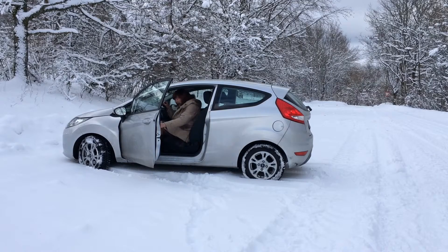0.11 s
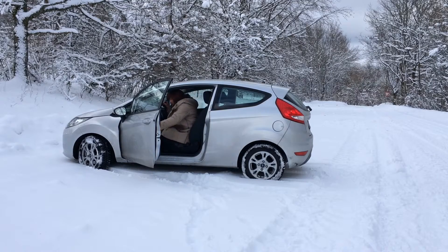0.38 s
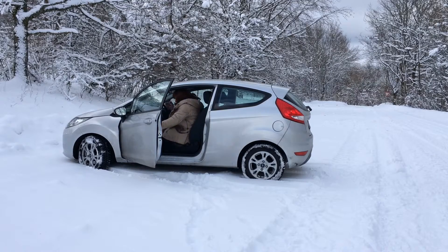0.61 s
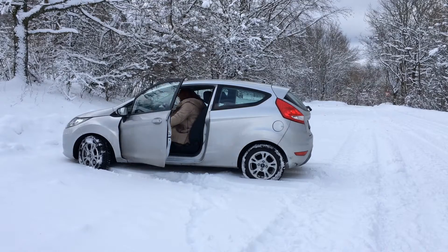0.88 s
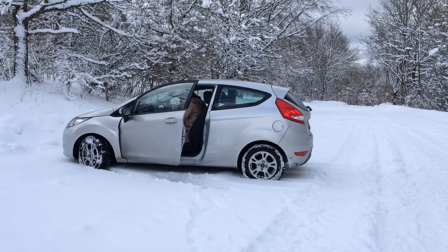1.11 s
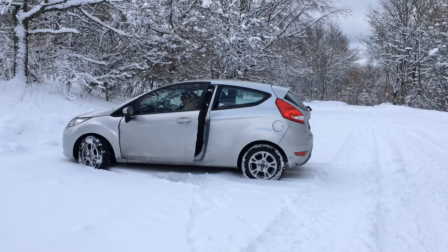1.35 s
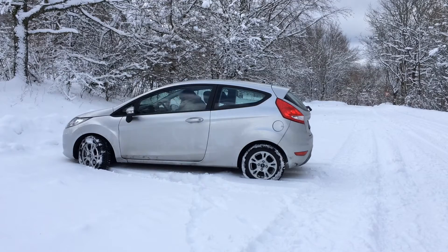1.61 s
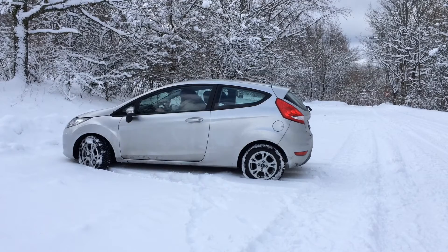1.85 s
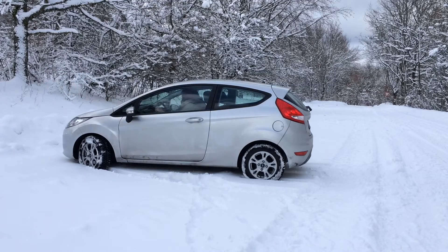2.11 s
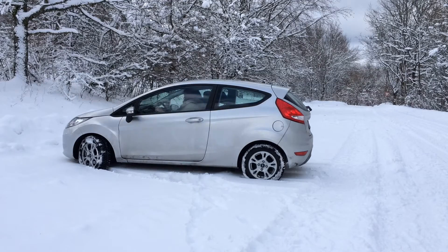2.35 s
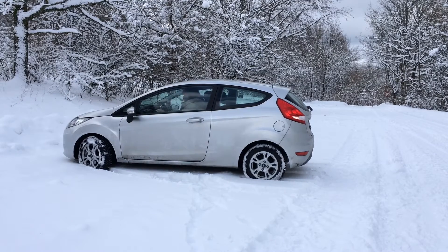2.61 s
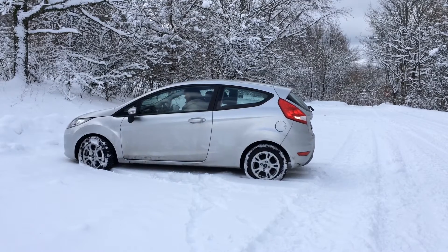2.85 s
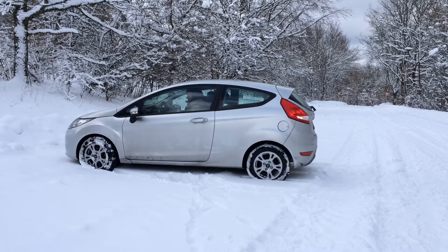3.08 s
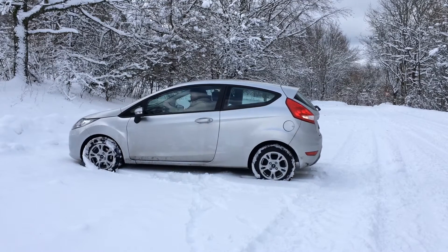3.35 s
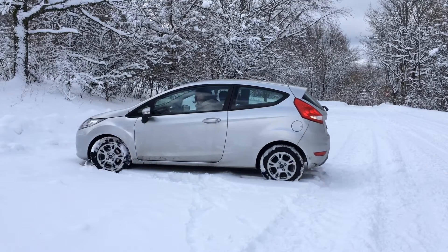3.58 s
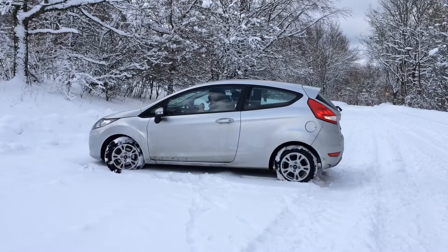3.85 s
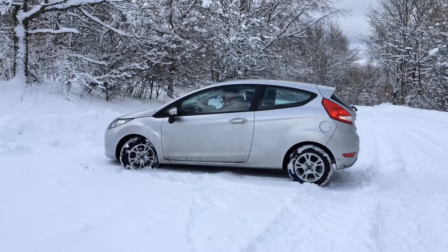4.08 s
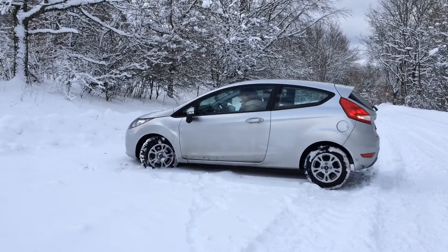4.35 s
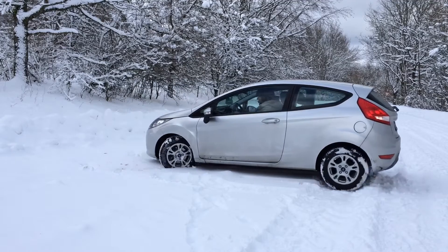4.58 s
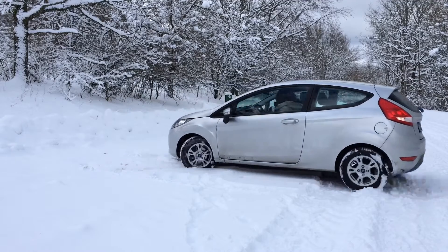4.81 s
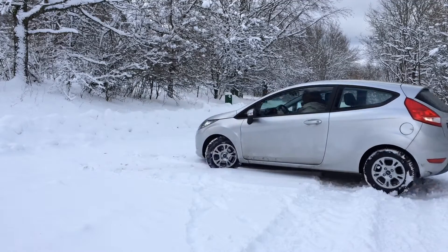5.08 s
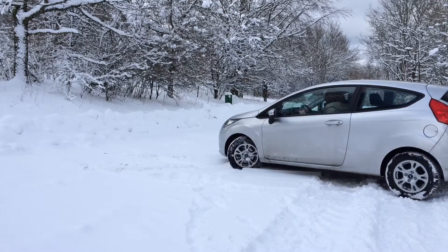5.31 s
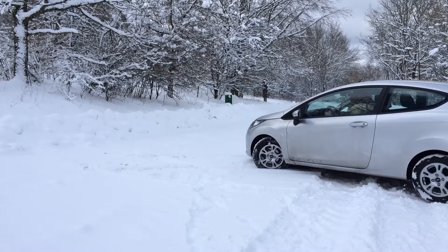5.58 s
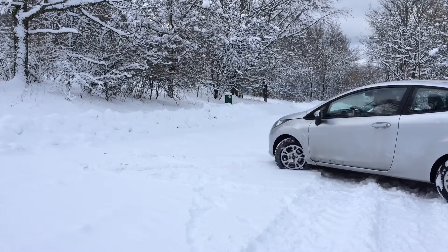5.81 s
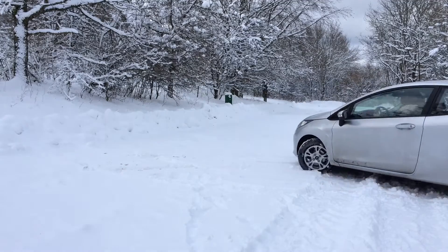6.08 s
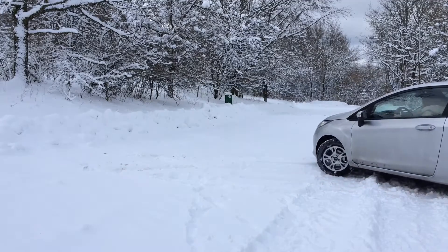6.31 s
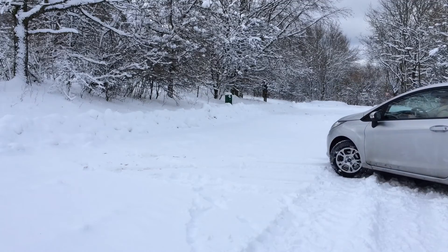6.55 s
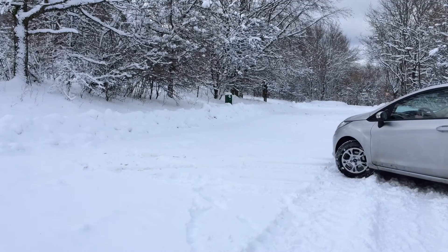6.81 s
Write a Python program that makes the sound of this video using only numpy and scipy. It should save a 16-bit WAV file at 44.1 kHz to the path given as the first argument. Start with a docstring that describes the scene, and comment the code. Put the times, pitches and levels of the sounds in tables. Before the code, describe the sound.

Mono outdoor sound, a few metres from a small car in a hushed, snow-muffled lane. From 0 to 1.6 s there is only low, faint air, tiny rustles, and soft wind bumps around 0.4-0.7 s. At 1.7 s the door slams: a hard metallic latch clack, panel knock and short rattle, with a deep cabin boom dying over about half a second. At 2.44 s everything dips briefly to silence. Low thumps follow and the engine emerges, climbing quickly until 3.2 s, then holding a firm clattery, hissy rev, strongest about 4-5 s. Heavy microphone thumps fall at 3.7-4.1 s. A reverse-gear whine rises in pitch from about 4 s to 5.8 s. After 5.2 s the revs sag, with a hollow, falling drone. From 6 s the engine subsides; packed snow cracks and crunches, sharpest near 6.75 s, as the clip ends quietly.

```python
"""Car backing out of a snowy lane

In a hushed lane under light wind, a car door slams: knocks and pushes ring damped modes, and low noise carries
the dying boom. The level dips briefly to nothing, then a four-cylinder engine revs as a sum of crank orders with
beating noise. The car backs away: gear-tooth harmonics whine through casing resonances, a sagging tone drones,
and packed snow cracks in grain bursts that ring the wheel arch. Low gust noise and sine puffs thump one microphone."""
import sys
import numpy as np
from scipy import signal
from scipy.fft import rfft, irfft
from scipy.io import wavfile
from scipy.ndimage import uniform_filter1d

SR = 44100
rng = np.random.default_rng(int(sys.argv[2]) if len(sys.argv) > 2 else 0)


def materialize(psi):
    """Save the field psi as 16-bit PCM at rate SR to the path in sys.argv[1].

    A 1-D psi becomes a single channel; in a 2-D psi each row is a channel.
    """
    bounded = np.clip(np.atleast_2d(psi).T, -1, 1)
    quanta = np.round(bounded * 32767).astype(np.int16)
    wavfile.write(sys.argv[1], SR, quanta)


def voltage_ratio(level):
    """Linear amplitude factor for a level in decibels (scalar or array-like)."""
    return 10 ** (np.asarray(level, float) / 20)


N = 305613
T = np.arange(N) / SR
TURN_S = 4.5  # time at which the slopes of the turning car cross zero


def evened(x):
    """Normalises the mean power, so that the rms is 1."""
    return x / np.sqrt(np.mean(x ** 2) + 1e-20)


def read(points, hz):
    """Interpolates a spectrum table along a logarithmic frequency axis."""
    f, value = np.transpose(points)
    return np.interp(np.log(hz + 1), np.log(f + 1), value)


def add(mix, s, sound):
    """Superposes a sound on the mix from time s."""
    part = mix[round(s * SR):][:len(sound)]
    part += sound[:len(part)]


def swell(start, rise, hold, fall):
    """Linear envelope that rises from 0 to 1, holds, and falls back; all arguments in seconds."""
    rising = (T - start) / rise
    falling = (start + rise + hold + fall - T) / fall
    return np.clip(np.minimum(rising, falling), 0, 1)


def drift(hz):
    """Slow random modulation of rms about 1, changing about hz times a second (at most 55)."""
    steps = rng.standard_normal(400)
    return uniform_filter1d(np.interp(T * min(hz, 55), np.arange(400), steps), 400) * 1.218


def noise(spectrum, patchy_db, size=1024):
    """Coloured noise of rms 1: random short-time spectra, with patches drifting in time and frequency."""
    frames = 4 * N // size + 5
    hz = np.fft.rfftfreq(size, 1 / SR)
    a, b, patches = rng.standard_normal((frames, len(hz), 3)).T
    patches = evened(uniform_filter1d(uniform_filter1d(patches, 10, 0), 12, 1))
    z = (a + 1j * b) * voltage_ratio(read(spectrum, hz)[:, None] + patchy_db * patches)
    return evened(signal.istft(z, nperseg=size, noverlap=3 * size // 4)[1][:N])


def resonant_noise(peaks):
    """Random excitation of a few resonances, each a bell-shaped peak in the noise spectrum."""
    bins = np.arange(300, 15600, 10.)
    lift = sum(voltage_ratio(db) / (1 + (2 * (bins - f) / width) ** 2) for f, width, db in peaks)
    return noise(np.c_[bins, 20 * np.log10(lift)], patchy_db=2.0, size=2048)


def near(modes, hz, fall_db):
    """Selective excitation: a blow favours modes near its own pitch, losing fall_db per octave away."""
    return [(f, db - fall_db * abs(np.log2(f / hz)), t60) for f, db, t60 in modes]


def ring(modes, seconds):
    """Impulse response of damped modes: a sum of exponentially dying sines, peak 1."""
    t = np.arange(round(seconds * SR)) / SR
    x = sum(voltage_ratio(db - 60 * t / t60) * np.sin(2 * np.pi * hz * t) for hz, db, t60 in modes)
    return x / abs(x).max()


def quiet():
    """Diffuse background: the far hush of the lane, slowly sinking, with faint resonant rustles."""
    # Hush of the lane. Each row: frequency in Hz, relative density in dB per Hz.
    hush_spectrum = [(18, -27), (30, -6), (59, 0.5), (108, -3.5), (160, 0), (263, -7.5), (389, -8.5),
                     (810, -15), (973, -9), (1170, -13.5), (1330, -10), (2770, -27.5), (3890, -28),
                     (14400, -35), (15600, -33)]
    # Faint high rustles. Each row: start, rise, hold and fall in seconds, level in dB.
    rustles = [(.04, .08, .1, .07, -80), (.41, .05, .1, .06, -81)]
    # Resonances of the rustles. Each row: frequency in Hz, width in Hz, relative level in dB.
    rustle_bands = [(2600, 600, -4), (4100, 700, 0), (6400, 900, -3)]
    hush_db, hush_db_per_s = -61.5, -0.84
    hush = voltage_ratio(hush_db + hush_db_per_s * T) * noise(hush_spectrum, patchy_db=0.85, size=2048)
    rustle_level = sum(voltage_ratio(row[4]) * swell(*row[:4]) for row in rustles)
    return hush + rustle_level * resonant_noise(rustle_bands)


def low_rumbles_and_puffs():
    """Low-frequency pressure: lumpy noise swells for gusts and the door's dying boom, damped sines for puffs."""
    # Low rumble. Each row: frequency in Hz, relative density in dB per Hz.
    rumble_spectrum = [(20, -24.5), (45, 6), (75, 8.5), (120, 6), (190, -3.5), (350, -35), (700, -62.5)]
    # Low rumbles: gusts, and the dying boom of the door at 1.9 s.
    # Each row: time of the top in seconds, level there in dB, rise and fall in dB per second.
    rumbles = [(0.0, -62, 98), (.47, -56.5, 70), (1.899, -45.5, 66.5), (4.06, -42, 36), (4.45, -40, 60),
               (4.72, -41.5, 108), (5.279, -43, 70), (5.5, -44.5, 30), (6.0, -44.5, 42), (6.93, -49.5, 38)]
    # Puffs that thump the microphone. Each row: start in seconds, level in dB, pitch in Hz, length scale in cycles.
    puffs = [(0.417, -40, 93, 1.7), (0.451, -35, 95, 2.1), (0.494, -32.5, 113, 1.9),
             (0.621, -38.5, 75.4, 0.91), (0.699, -52, 75.4, 1.9), (0.74, -47, 59.2, 1.5),
             (1.244, -40.5, 98, 1.9), (1.549, -48, 64.9, 2.3), (2.378, -47, 82, 1.8),
             (2.491, -25.5, 64.4, 0.97), (2.519, -30.5, 62.6, 2), (2.544, -24.5, 98, 0.93),
             (2.573, -33.5, 96.4, 3.3), (3.709, -21.5, 74.4, 1.5), (3.771, -28, 75, 0.94),
             (3.969, -21, 81, 1.8), (4.01, -21.5, 72, 0.83), (4.046, -18.5, 70.0, 0.51),
             (4.112, -46, 74.9, 1.05), (4.52, -27.5, 82.85, 1.2), (5.969, -30.5, 105.3, 2.2),
             (6.019, -31, 123.4, 1.9), (6.858, -43, 75.4, 2.5), (6.899, -39, 63, 1.5)]
    lumpy_db = 2.0
    level = np.zeros(N)
    for s, db, db_per_s in rumbles:
        level = np.maximum(level, voltage_ratio(db - db_per_s * abs(T - s)))
    rumble = noise(rumble_spectrum, patchy_db=0.0, size=2048)
    out = level * rumble * voltage_ratio(lumpy_db * drift(hz=35.2))
    for s, db, hz, cycles in puffs:
        u = np.arange(round(3 * cycles / hz * SR)) / SR * hz / cycles  # time in length scales
        envelope = np.e * 1.43 * u * np.exp(-2.5 * u)
        add(out, s, voltage_ratio(db) * envelope * np.sin(2 * np.pi * cycles * u))
    return out


def cracks():
    """Brittle fracture of packed snow: bursts of grains, heard directly and ringing nearby modes."""
    # Cracks and small knocks. Each row: start in seconds, peak of the ringing part in dB,
    # centre frequency in Hz, dry grit against ring in dB.
    events = [(0.563, -47, 800, -1), (2.469, -43.5, 890, -17), (2.569, -40.5, 640, -10),
              (6.007, -40.5, 1190, 3.5), (6.025, -41.5, 1220, -3), (6.104, -45, 1100, -13),
              (6.152, -42.5, 1206, -1), (6.487, -44, 1850, -6), (6.494, -38, 1572, 2.5),
              (6.537, -51, 1071, 4), (6.625, -40.5, 1150, -3), (6.644, -47, 1080, -11),
              (6.663, -46, 1285, -11.5), (6.697, -44, 1280, -4), (6.738, -43, 1180, -2),
              (6.756, -29.5, 1384, -4), (6.773, -35, 1295, -17), (6.787, -40.5, 1210, -2.5),
              (6.805, -52, 1494, -18)]
    # Wheel arch modes. Each row: frequency in Hz, relative level in dB, 60 dB decay time in seconds.
    wheel_arch = [(1100, -10, 0.12), (1190, -11, 0.047), (1440, -34, 0.01), (1444, -1, 0.019),
                  (1940, -4.5, 0.04), (2090, 1, 0.017), (2910, -14.5, 0.018), (3030, 6, 0.015),
                  (3980, -18, .02), (6100, -20, .015)]
    # Breaking snow. Each row: frequency in Hz, relative density in dB per Hz.
    grit_spectrum = [(300, -33), (700, -44), (1200, 10), (2000, 6.5), (3000, -1), (4000, -6.5),
                     (6500, -11.5), (9000, -16), (15600, -28)]
    fall_db, rise_s, crack_s = 9, 0.0044, .018
    out = np.zeros(N)
    t = np.arange(2048) / SR
    colour = voltage_ratio(read(grit_spectrum, np.fft.rfftfreq(2048, 1 / SR)))
    shape = np.minimum(t / rise_s, 1) * np.exp(-3 * t / crack_s)
    for s, db, hz, dry_db in events:
        grains = rng.standard_normal(2048)
        modes = near(wheel_arch + [(hz, 2, .025)], hz, fall_db)  # one more mode at the crack's own pitch
        spiky = grains * abs(grains) * shape
        rung = np.convolve(spiky, ring(modes, .08))
        grit = irfft(rfft(grains) * colour) * shape
        add(out, s, voltage_ratio(db) * rung / abs(rung).max())
        add(out, s, voltage_ratio(db + dry_db) * grit / abs(grit).max())
    return out


def door():
    """Modal excitation: knocks ring the panel and shake a rattle; pushes on the seals ring the cabin."""
    # Knocks of latch and door skin. Each row: start in seconds, rattle level in dB, panel peak in dB, pitch in Hz.
    knocks = [(1.679, -55.5, -40, 900), (1.691, -46.5, -21.5, 587), (1.696, -35, -27.5, 700),
              (1.7003, -34, -9, 816), (1.704, -24.5, -3, 1310), (1.71, -33, -22, 700),
              (1.7284, -26, -22.5, 2400), (1.752, -42, -31.5, 2000), (1.768, -41.5, -39.5, 2200),
              (1.791, -55, -46.5, 900), (1.822, -64, -50, 500)]
    # Pushes of the door on its seals. Each row: start in seconds, level in dB, pitch of the boom in Hz.
    pushes = [(1.691, -30.5, 160), (1.709, -13, 70), (1.7205, -4.5, 70), (1.752, -11.5, 160),
              (1.769, -13, 160), (1.776, -9.5, 113), (1.791, -15, 113), (1.823, -25, 113)]
    # Door skin and latch. Each row: frequency in Hz, relative level in dB, 60 dB decay time in seconds.
    panel_modes = [(573, -5.5, 0.15), (700, 1.5, 0.065), (786, -7.5, 0.073), (1080, 2, 0.013),
                   (1240, 5.5, 0.018), (1420, -7.5, 0.01), (1850, -19, .03), (2320, -9, .04),
                   (2320, 3, 0.014), (2460, -4.5, 0.041), (4850, -13, .015), (5840, -11, 0.011),
                   (6700, -3.5, .012)]
    # Cabin air and shell. Each row: frequency in Hz, relative level in dB, 60 dB decay time in seconds.
    cabin_modes = [(70, 6.5, 0.12), (99.5, -9.5, .5), (113, -4.5, 0.64), (160, -8, 0.13), (202, -19, .25)]
    # Trim and glass shaking. Each row: frequency in Hz, relative density in dB per Hz.
    rattle_spectrum = [(120, -25), (170, -11.5), (250, -25.5), (360, -4), (480, -8.5), (650, -3),
                       (780, -11.5), (1070, -9.5), (1690, -14.5), (2220, -6.5), (3620, -19.5),
                       (5000, -14.5), (6980, -13), (9000, -23.5), (15600, -35)]
    # Damping of the rattle. Each row: frequency in Hz, 60 dB decay time in seconds.
    rattle_t60 = [(200, 0.53), (500, 0.37), (1000, 0.25), (2500, 0.1), (4000, 0.055), (8000, 0.038)]
    fall_db = 12
    out = np.zeros(N)
    cushion = np.hanning(180) / 90  # the seals spread the push over 4 ms
    hz, t, _ = signal.stft(np.zeros(SR // 2), SR, nperseg=256, noverlap=192)  # for its axes alone
    decay_db = 60 * t / np.clip(read(rattle_t60, hz), .01, 1)[:, None]
    shape = voltage_ratio(read(rattle_spectrum, hz)[:, None] - decay_db)
    for s, rattle_db, panel_db, knock_hz in knocks:
        z = rng.standard_normal(shape.shape) + 1j * rng.standard_normal(shape.shape)
        rattle = signal.istft(z * shape, nperseg=256, noverlap=192)[1]
        rattle[:88] *= np.hanning(176)[:88]  # swells within 2 ms
        contact = rng.standard_normal(44) * np.hanning(44)  # a rough contact of 1 ms
        knock = np.convolve(ring(near(panel_modes, knock_hz, fall_db), .2), contact)
        add(out, s, voltage_ratio(rattle_db) * rattle / np.std(rattle[:300]))
        add(out, s, voltage_ratio(panel_db) * knock / abs(knock).max())
    for s, db, boom_hz in pushes:
        boom = ring(near(cabin_modes, boom_hz, fall_db), .9)
        add(out, s, voltage_ratio(db) * np.convolve(boom, cushion))
    return out


def engine_bay(firings):
    """Amplitude modulation: clatter and metal beat with each firing, valve gear ticks in the hiss."""
    # Clatter. Each row: frequency in Hz, relative density in dB per Hz.
    clatter_spectrum = [(150, 8), (250, 1.5), (400, -2.5), (700, -4), (1000, -6), (1300, 0), (1600, -18.5),
                        (2050, -10.5), (2990, -14), (3600, -32.5), (5500, -26.5), (8000, -49)]
    # Hiss. Each row: frequency in Hz, relative density in dB per Hz.
    hiss_spectrum = [(1760, 1.5), (3000, -5.5), (3690, -5.5), (4380, -3.5), (5030, -8.5), (6810, -7.5),
                     (9280, -14), (10200, -14), (11700, -10.5), (14600, -12.5), (15600, -19)]
    # Sheet metal of the bay. Each row: frequency in Hz, width in Hz, relative level in dB.
    bay_metal = [(1210, 47, 5.5), (1840, 91, -2), (2400, 54, 1), (2638, 53, 4), (2974, 75, 2.5),
                 (3280, 230, -5), (4600, 140, -15)]
    # Panel heard while the car is side-on. Each row: frequency in Hz, width in Hz, relative level in dB.
    side_panel = [(1307, 48, -6), (1519, 145, 1), (6640, 1700, -19), (11900, 2000, -24)]
    # How hard and how near the car works. Each row: time in seconds, effort in dB.
    effort = [(2.45, -20), (2.52, -15), (2.65, -11.5), (2.92, -7), (3.56, -3), (3.98, 0), (4.43, -0.5),
              (4.86, -0.5), (5.21, -1.5), (5.53, -3), (5.84, -6.5), (6.21, -7.5), (6.65, -11),
              (6.93, -16.5)]
    # Clatter, hiss, bay metal, side panel. Each row: level in dB at full effort and at TURN_S,
    # share of effort followed, change in dB per second as the car turns away.
    layer_levels = [(-49, .95, 0.65), (-59.5, 0.5, -0.07), (-62.5, 0.57, 0.4), (-62.5, 0.63, -2.3)]
    tick_db, tick_decay_s = -12, 0.016
    beat = 1 + .38 * np.cos(2 * np.pi * firings)
    clatter = noise(clatter_spectrum, patchy_db=1.2, size=2048) * beat
    ticks = (np.diff(np.floor(firings), prepend=0) > 0) * voltage_ratio(3 * rng.standard_normal(N))
    ticks = evened(signal.lfilter([1], [1, -np.exp(-1 / (tick_decay_s * SR))], ticks))
    hiss_level = voltage_ratio(1.6 * drift(hz=50)) + voltage_ratio(tick_db) * ticks
    hiss = noise(hiss_spectrum, patchy_db=1.0) * hiss_level
    layers = clatter, hiss, resonant_noise(bay_metal) * beat, resonant_noise(side_panel) * beat
    effort_db = np.interp(T, *np.transpose(effort), -300)  # silent before the first row
    out = 0
    for (db, share, db_per_s), layer in zip(layer_levels, layers):
        out = out + voltage_ratio(db + share * effort_db + db_per_s * (T - TURN_S)) * layer
    return out


def engine():
    """Harmonic synthesis: exhaust orders locked to the crank angle, with the engine bay beating along."""
    # Engine run. Each row: time in seconds, firings per second in Hz, firing tone in dB, bark of upper orders in dB.
    running = [(2.62, 47.6, -62, -49), (2.75, 56.4, -56, -45.5), (2.869, 64.7, -47.5, -42),
               (2.941, 67.35, -40, -44.5), (3.201, 75.86, -40.5, -52), (3.7, 79.8, -41.5, -40.5),
               (3.9, 80.92, -48.5, -40.5), (4.42, 82.77, -38.5, -38), (4.639, 85.03, -40, -38),
               (4.83, 84, -37, -37), (5.0, 84.86, -50, -35), (5.201, 81.9, -46, -49),
               (5.54, 76.96, -40.5, -48), (5.629, 74.2, -44, -51.5), (5.79, 66.97, -41, -49),
               (5.94, 57.9, -52.5, -50), (6.07, 54.5, -45.5, -44), (6.1, 51.5, -71, -59)]
    # Exhaust orders; four cylinders fire twice a turn. Each row: multiple of crank speed, relative level in dB.
    exhaust = [(1, -19), (2, 0), (3, -15), (4, -10.5), (5, -24.5), (6, -24.5), (8, -18.5), (9, -36),
               (10, -29.5), (12, -21.5), (13, -46), (14, -34), (16, -23), (18, -25), (20, -37), (21, -41),
               (22, -25), (25, -33), (26, -33), (27, -49), (28, -36), (29, -40)]
    # Hollow resonance opening in the exhaust note: start, rise, hold and fall in seconds, lift in dB.
    hollow = (5.366, 0.34, 0.15, 0.24, 11)
    # Note at twice the firing rate as the clutch bites: start, rise, hold and fall in seconds, level in dB.
    shudder = (2.6, .12, .085, .02, -46)
    hollow_hz, hollow_width_hz = 345, 90
    tilt_start_db, dulling_db = -0.7, 0.1686  # bark slope per octave, and its loss per Hz/s of slowing
    s, hz, tone_db, bark_db = np.transpose(running)
    tone_db, bark_db = (np.interp(T, s, c, -150, -150) for c in (tone_db, bark_db))
    hz = np.interp(T, s, hz)
    slowing = np.maximum(-uniform_filter1d(np.gradient(hz) * SR, size=4000), 0)
    tilt_db = tilt_start_db - dulling_db * slowing
    firings = np.cumsum(hz * (1 + .0015 * drift(hz=25))) / SR
    hollow_db = hollow[4] * swell(*hollow[:4])
    tone = 0
    for k, db in exhaust:
        level_db = tone_db if k < 5 else bark_db + tilt_db * np.log2(k / 12)
        # an order sounds at k * hz / 2, so both terms here are doubled
        level_db = level_db + hollow_db / (1 + ((k * hz - 2 * hollow_hz) / hollow_width_hz) ** 2)
        level = voltage_ratio(db + level_db + 2 * drift(hz=15))
        tone = tone + level * np.cos(np.pi * k * firings + k * k / 9)
    shudder_level = voltage_ratio(shudder[4] + 3 * drift(hz=30.1)) * swell(*shudder[:4])
    tone = tone + shudder_level * np.cos(4 * np.pi * firings)
    return np.sqrt(2) * tone + engine_bay(firings)


def gear():
    """Source and filter: straight-cut teeth give a harmonic comb, lifted where it crosses casing resonances."""
    # Reverse gear. Each row: time in seconds, tooth pattern rate in Hz.
    tooth_rate = [(3.7, 128.8), (4.12, 137.3), (4.3, 141.6), (4.4, 147.5), (4.46, 145.9), (4.55, 150.8),
                  (4.78, 167.5), (4.9, 180.4), (5.05, 188.1), (5.14, 181.6), (5.26, 177.5), (5.4, 183.4),
                  (5.5, 184.5), (5.63, 188.9), (5.68, 180.7), (5.8, 180.5), (5.9, 170), (6.0, 167.4)]
    # Gearbox casing. Each row: frequency in Hz, width in Hz, relative level in dB.
    casing = [(1110, 150, 1), (1285, 70, -4), (1555, 80, 1), (1830, 110, -3), (2040, 80, -4)]
    # Course of the whine: start, rise, hold and fall in seconds, level in dB, dB per second from the end of the rise.
    whine_course = (3.9, .4, 1.55, .12, -56, -4.5)
    brighten_db = 4  # upward tilt as the car turns, dB per octave per second
    pitch = np.interp(T, *np.transpose(tooth_rate)) * (1 + .004 * drift(hz=50))
    turns = 2 * np.pi * np.cumsum(pitch) / SR
    whine = 0
    for k in range(5, 13):
        lift = sum(voltage_ratio(db) / (1 + (2 * (k * pitch - f) / width) ** 2) for f, width, db in casing)
        tilt_db = brighten_db * (T - TURN_S) * np.log2(k * pitch / 1300)
        whine = whine + lift * voltage_ratio(3.5 * drift(hz=25) + tilt_db) * np.cos(k * turns + k * k)
    start, rise, hold, fall, db, db_per_s = whine_course
    level = swell(start, rise, hold, fall) * voltage_ratio(db + db_per_s * (T - start - rise))
    return np.sqrt(2) * level * whine


def drone():
    """Narrow-band modulation: a sagging tone with slow noise on its in-phase and quadrature parts."""
    # Swells of the drone as the car rolls out. Each row: start in seconds, hold in seconds,
    # level in dB, starting frequency in Hz.
    swells = [(5.444, 0.26, -53.5, 360.8), (6.058, 0.45, -55, 351.4), (6.595, .04, -55, 344),
              (6.833, .1, -57.5, 348)]
    rise_s, fall_s, sag_hz_per_s = 0.1, 0.12, 42.3
    a, b = evened(uniform_filter1d(uniform_filter1d(rng.standard_normal((2, N)), 350), 350))
    out = 0
    for s, hold, db, hz in swells:
        turns = 2 * np.pi * (hz - sag_hz_per_s * (T - s) / 2) * (T - s)
        rough = (1 + .7 * a) * np.cos(turns) + .7 * b * np.sin(turns)
        out = out + voltage_ratio(db) * swell(s, rise_s, hold, fall_s) * rough
    return out


def scene():
    """Linear superposition of all sources in one channel, with a brief dip to nothing."""
    # The dip: time of silence in seconds, fade out in seconds, fade in in seconds.
    dip = (2.443, .035, .03)
    s, fade_out, fade_in = dip
    gap = np.clip(np.maximum((s - T) / fade_out, (T - s) / fade_in), 0, 1)
    sources = quiet() + low_rumbles_and_puffs() + cracks() + door() + engine() + gear() + drone()
    return (gap * sources)[None]


def roll_off(x):
    """The treble ends steeply here."""
    return signal.sosfilt(signal.butter(12, 15710, fs=SR, output="sos"), x)


def record(dry):
    """High-pass filtering: a third-order Butterworth rumble filter at 33 Hz."""
    rumble_filter = signal.butter(3, 33, "high", fs=SR, output="sos")
    filtered = signal.sosfilt(rumble_filter, dry)
    return roll_off(filtered)


dry = scene()
out = record(dry)
materialize(out)
```